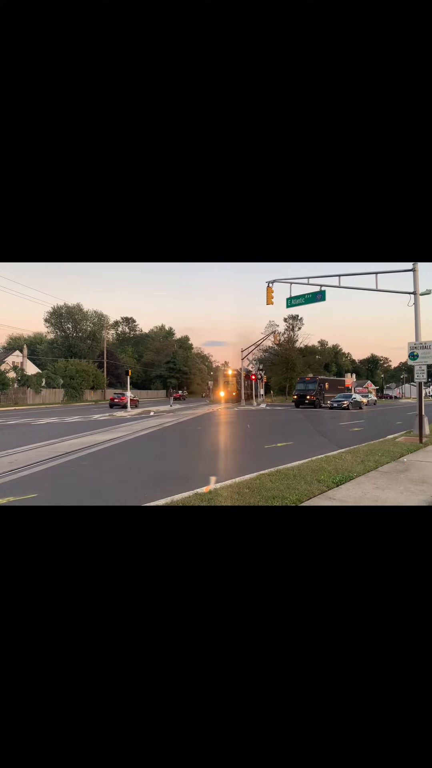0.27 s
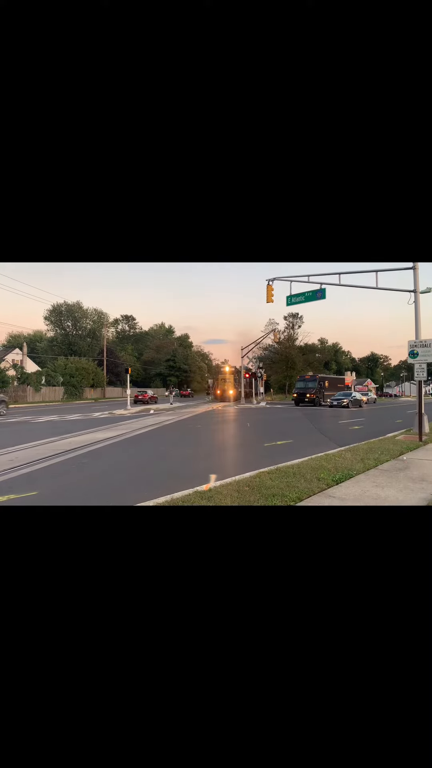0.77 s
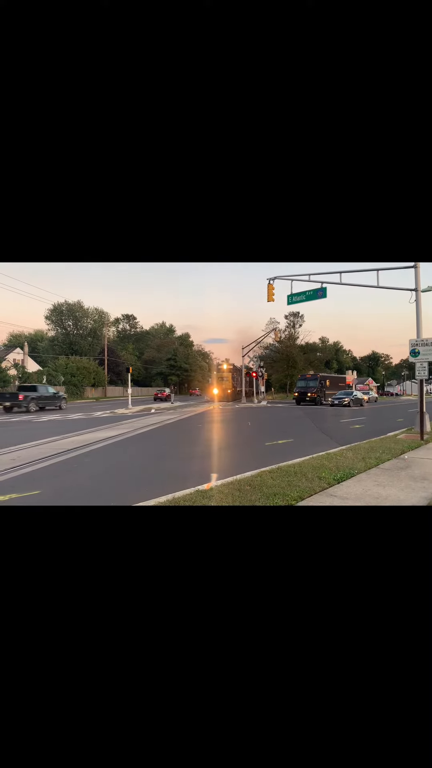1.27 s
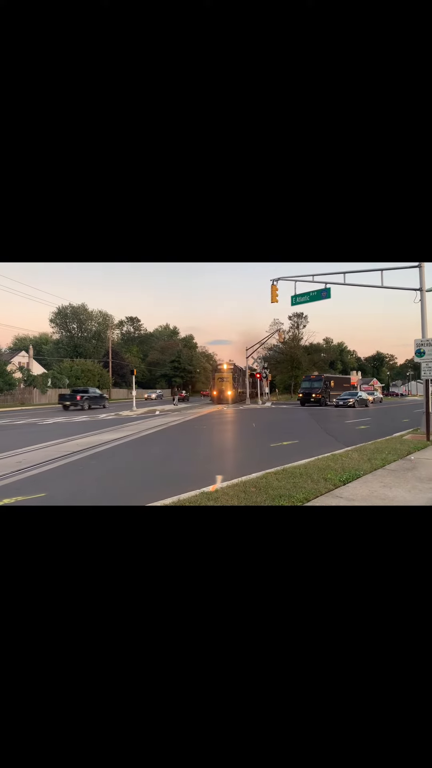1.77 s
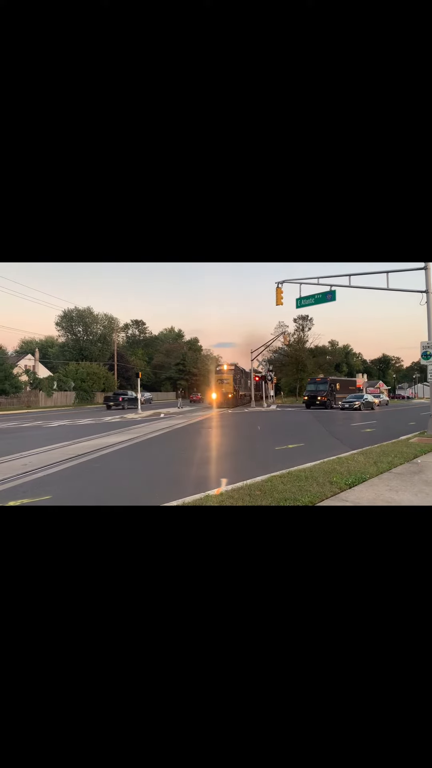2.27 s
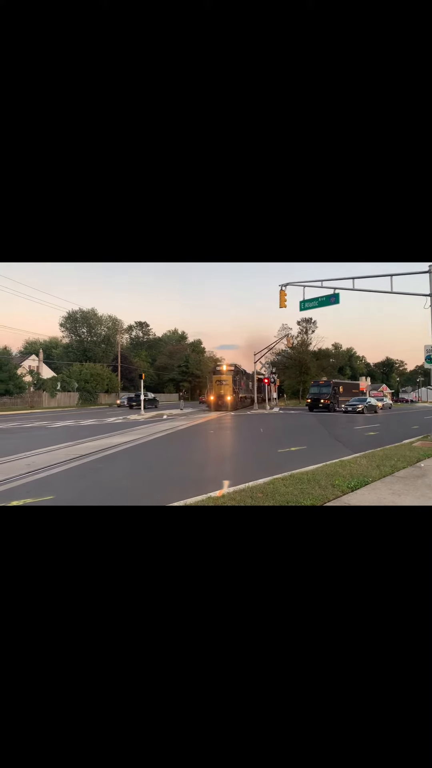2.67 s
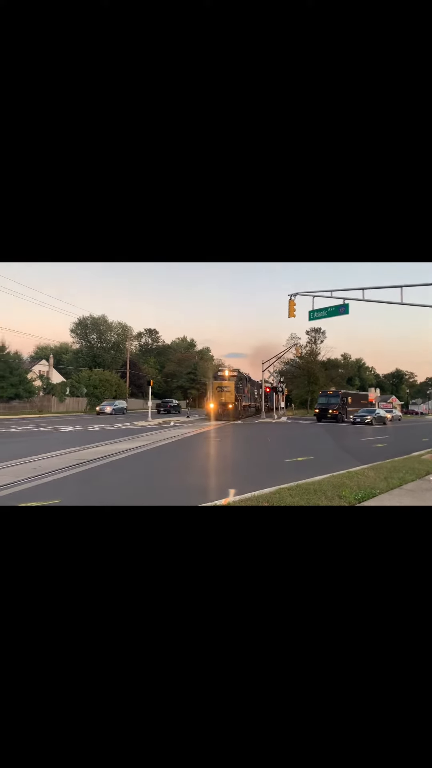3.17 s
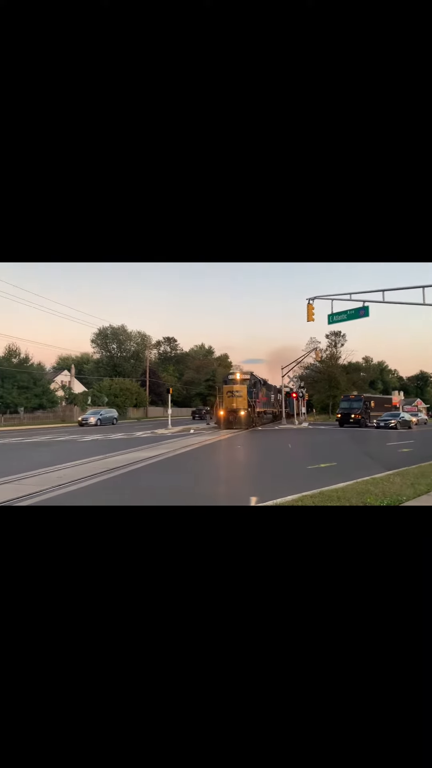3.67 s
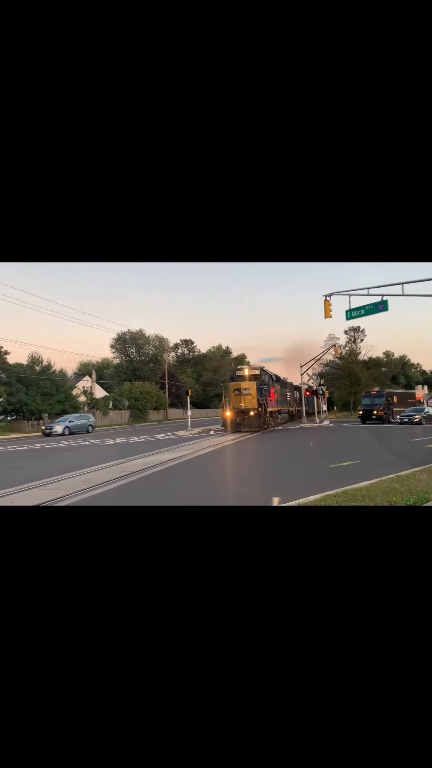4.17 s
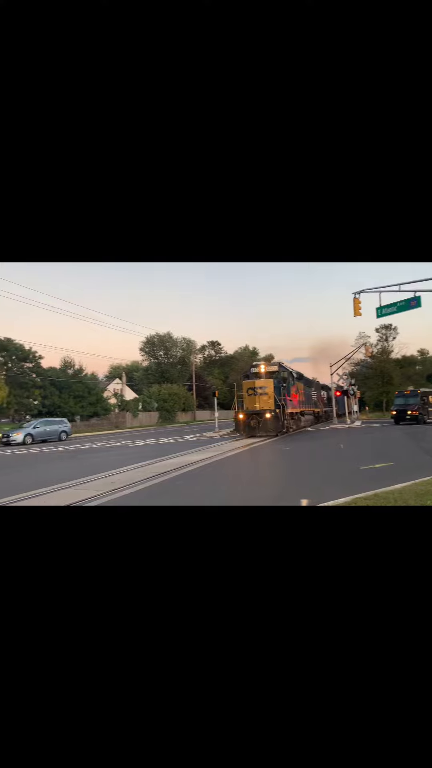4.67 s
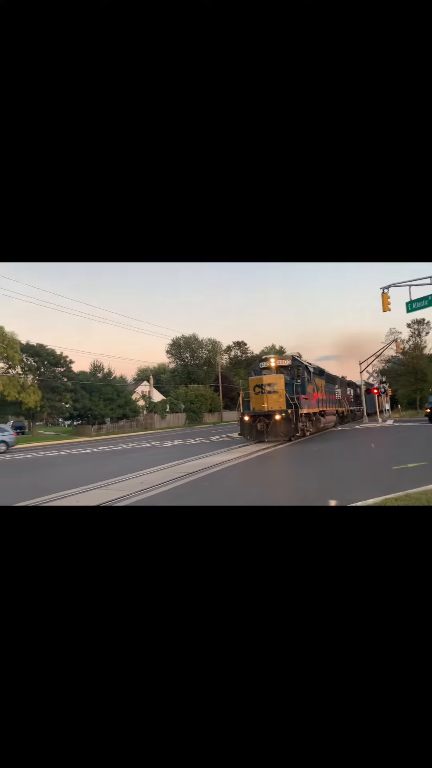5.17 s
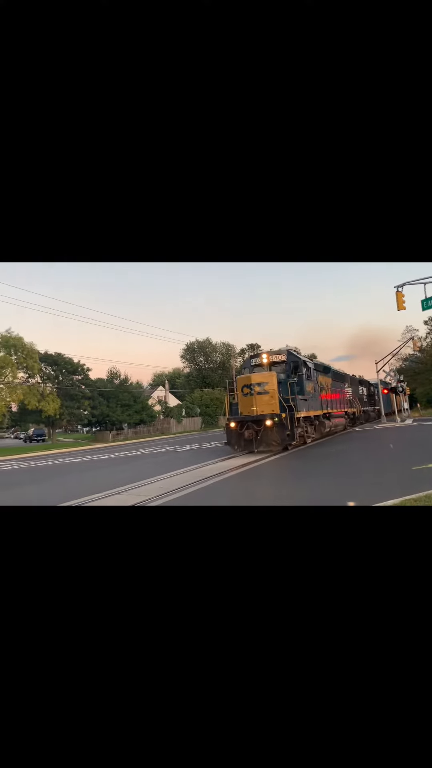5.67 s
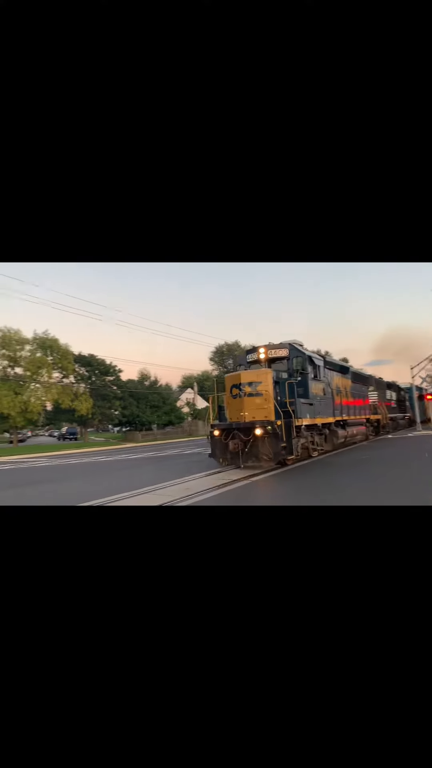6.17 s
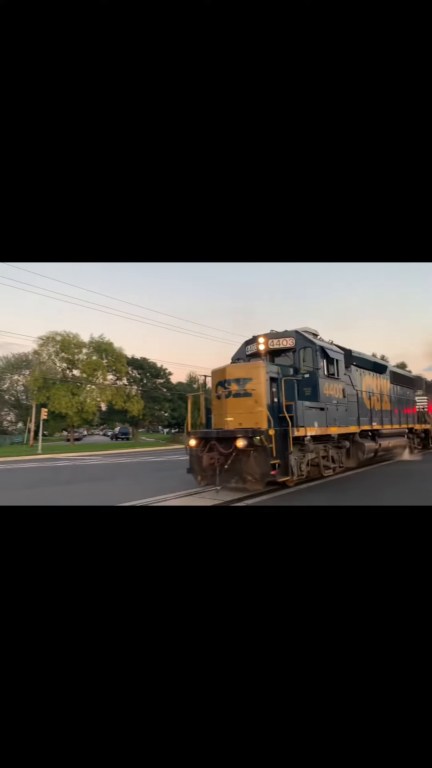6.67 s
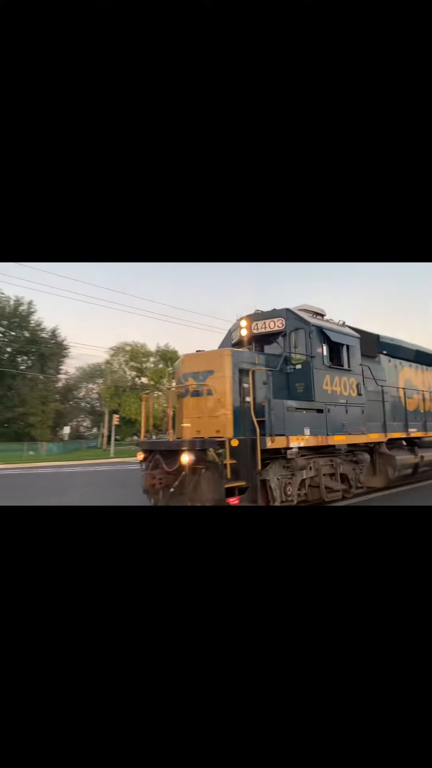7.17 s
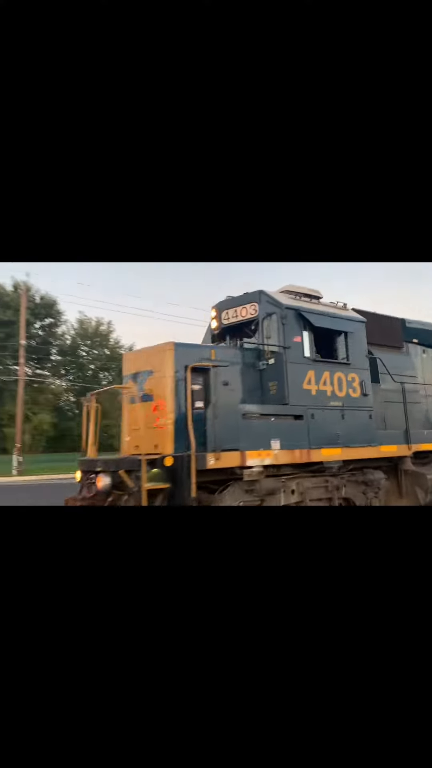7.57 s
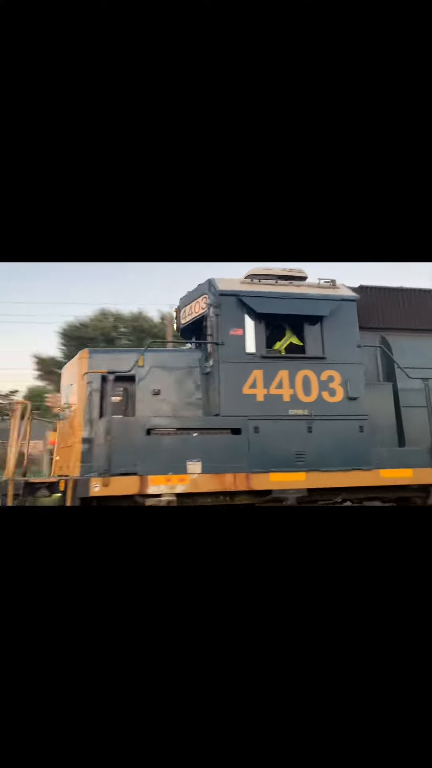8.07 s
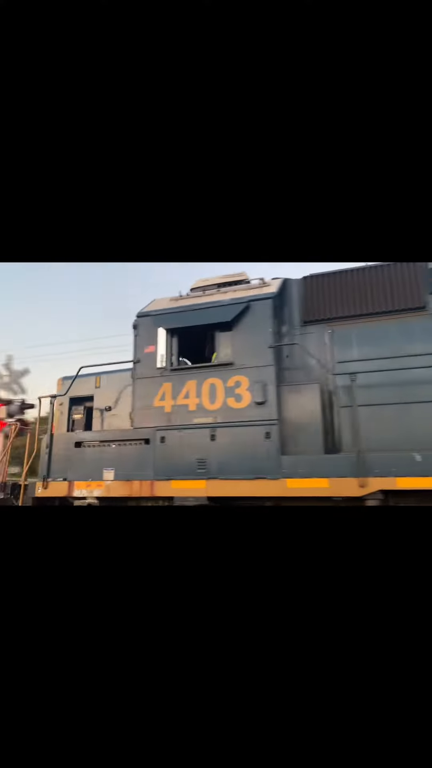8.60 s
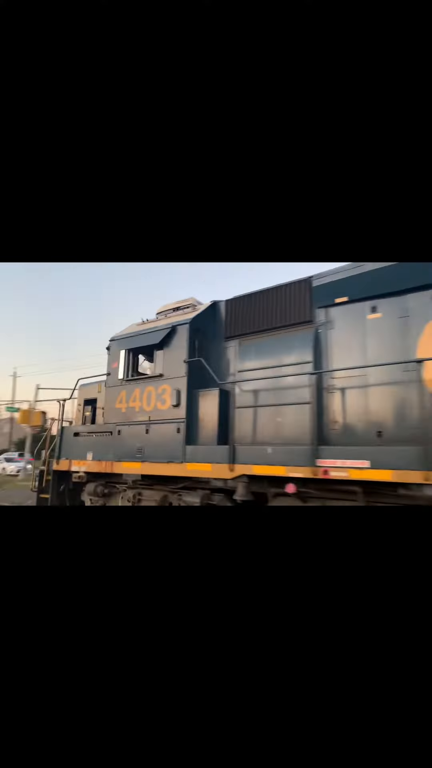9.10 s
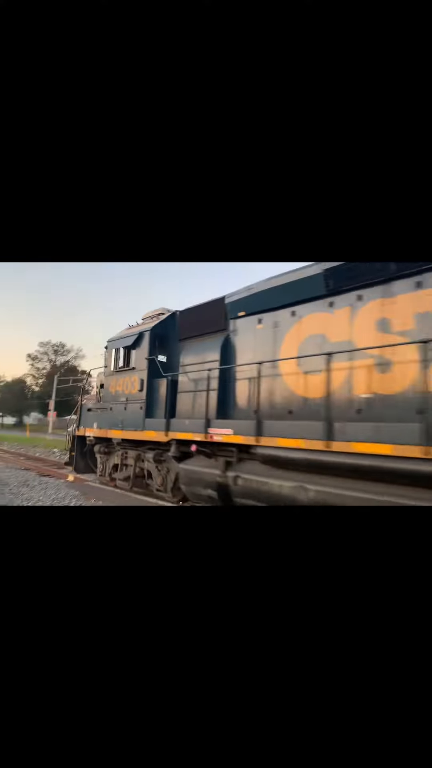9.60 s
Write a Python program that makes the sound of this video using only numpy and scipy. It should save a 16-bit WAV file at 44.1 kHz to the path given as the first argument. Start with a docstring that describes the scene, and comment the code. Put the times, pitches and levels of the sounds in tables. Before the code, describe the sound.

Crossing gongs clang while a freight engine approaches, toots briefly, blares one long echoing horn, tolls its bell and rumbles past close with hissing air.

```python
"""A diesel locomotive throbs, nearing a road crossing and a phone, and crossing gongs ring throughout; over them come
a short blast of its five-pipe air horn, four bell strokes, a brief leak of air, a wheel knock and a long blast.
Walls behind the train throw horn and bell back late and lower in pitch; gain control turns the sound down and holds
it there. Four more strokes follow; up close, air hisses and wheels knock again. Horn, bell, gongs and engine are sums
of tones; air, road, fans and rumble are shaped noise."""
import sys
import numpy as np
from scipy import signal
from scipy.fft import rfft, irfft
from scipy.io import wavfile
from scipy.ndimage import uniform_filter1d, minimum_filter1d

SR = 44100
rng = np.random.default_rng(int(sys.argv[2]) if len(sys.argv) > 2 else 0)


def inscribe(sig):
    """Save sig as 16-bit PCM at rate SR to the path in sys.argv[1].

    A 1-D sig is mono; a 2-D sig holds one channel per row.
    Samples are clipped to [-1, 1] before scaling.
    """
    pcm = np.round(np.clip(np.atleast_2d(sig).T, -1, 1) * 32767)
    wavfile.write(sys.argv[1], SR, pcm.astype(np.int16))


def volts_from_decibels(level):
    """Turn decibel levels (scalar or array-like) into linear amplitude factors."""
    exponent = np.asarray(level, float) / 20
    return 10 ** exponent


N = 433944
T = np.arange(N) / SR
FRAME_T = np.arange(-4, N // 256 + 5) * 256 / SR
BIN_HZ = np.fft.rfftfreq(1024, 1 / SR)


def evened(x):
    """Scales to rms 1."""
    return x / np.sqrt(np.mean(abs(x) ** 2) + 1e-20)


def read(points, hz):
    """Reads a spectrum on a log-frequency axis."""
    f, value = np.transpose(points)
    return np.interp(np.log(hz + 1), np.log(f + 1), value)


def curves(rows, t):
    """Joins the rows of a table by straight lines, one curve per column after the time."""
    s, *columns = np.transpose(rows)
    return [np.interp(t, s, c) for c in columns]


def add(mix, s, sound):
    """Mixes a sound in at time s, cropped to the mix."""
    start = round(s * SR)
    part = mix[..., max(start, 0):start + sound.shape[-1]]
    part += sound[..., max(-start, 0):][..., :part.shape[-1]]


def drift(t, rate_hz, count):
    """Slow random curves of rms about 1, one row for each of count things."""
    steps = int((t[-1] - t[0]) * rate_hz * 2) + 40
    rows = uniform_filter1d(rng.standard_normal((count, steps * 4)), 4) * 2
    return np.array([np.interp((t - t[0]) * rate_hz * 8, np.arange(steps * 4), r) for r in rows])


def shape(points, lo_hz=0, hi_hz=30000):
    """Gains per bin, of power 1 between lo_hz and hi_hz."""
    gain = volts_from_decibels(read(points, BIN_HZ))
    inside = (BIN_HZ >= lo_hz) & (BIN_HZ <= hi_hz)
    return (gain / np.linalg.norm(gain[inside]))[:, None]


def coloured(points, count):
    """A stretch of noise with the given spectrum, rms 1."""
    gain = volts_from_decibels(read(points, np.fft.rfftfreq(count, 1 / SR)))
    return evened(irfft(rfft(rng.standard_normal(count)) * gain, count))


def noise(gain, patchy_db):
    """Two unrelated noises with the given short-time spectrum and shared drifting patches."""
    a, b, c, d, patches = rng.standard_normal((len(FRAME_T), 513, 5)).T
    patches = evened(uniform_filter1d(uniform_filter1d(patches, 10, 0), 12, 1))
    z = np.array([a + 1j * b, c + 1j * d]) * gain * volts_from_decibels(patchy_db * patches)
    out = signal.istft(z, nperseg=1024, noverlap=768)[1][:, 1024:N + 1024]
    return out * np.sqrt(3 / 2)  # makes up for averaging unrelated frames


def ring(hz, db, t60, t):
    """One mode, decaying exponentially from a random phase."""
    return volts_from_decibels(db - 60 * t / t60) * np.sin(2 * np.pi * (hz * t + rng.random()))


# Horn pipes. Each row: nominal pitch in Hz, level in dB, slope in dB per octave of overtone.
PIPES = [(318.1, -4, 0), (374.4, 0.3, 0), (431, -4.5, 1.5), (498.4, -1, 0), (632.8, 2, 0.1)]
# Time each pipe speaks on after the valve shuts, in s, in pipe order.
PIPE_LINGER_S = [0.025, 0.0044, 0.029, .004, 0.037]
# Response of the flares. Each row: frequency in Hz, gain in dB.
FLARE_RESPONSE = [(250, -16), (330, -12.5), (500, -10.5), (640, 1.5), (760, 1), (870, -6), (1130, -14.5),
                  (1280, -11), (1900, -15.5), (2600, -27.5), (3500, -40.5), (3750, -32), (4500, -29)]
# Rasp spectrum. Each row: frequency in Hz, density in dB per Hz.
RASP_SPECTRUM = [(500, -23), (1500, -1), (2500, -16.5), (4000, -9.5), (7000, -19.5), (10800, -24.5),
                 (11300, -62), (16000, -78)]
HORN_RISE_S, SWELL_DB, SWELL_S, RELEASE_DB_PER_S = 0.036, 10.5, 0.14, 455  # speaks fast, swells to full pressure
SHARP, SHARP_S = 0.02946, 0.0604  # starts sharp by this share and settles
BRIGHT_START, BRIGHT_FULL = -0.35, 0.24  # dB per octave above 900 Hz
LOW_SWELL_DB = 3.5  # gain of the tones below 550 Hz at full pressure


def horn(length_s, full_db, ratio, low_db):
    """Five reeds buzz into flared pipes, sharp at first; overtones shimmer in moving air over a pulsing rasp."""
    t = T[:round(length_s * 10 + 2) * SR // 10]
    lack = np.exp(-t / SWELL_S)  # missing pressure
    pitch = ratio * (1 + SHARP * np.exp(-t / SHARP_S))
    low_db = low_db + LOW_SWELL_DB * (1 - lack)
    bright = BRIGHT_FULL + (BRIGHT_START - BRIGHT_FULL) * lack
    steady = out = puffs = 0
    for (pipe_hz, pipe_db, slope_db), linger_s in zip(PIPES, PIPE_LINGER_S):
        reed = 1 + 0.0004 * drift(t, 34, count=1)[0]
        turns = np.cumsum(pipe_hz * pitch * reed) / SR
        puffs = puffs + np.exp(-(turns % 1) / 0.32)
        pipe = 0
        overtones = np.arange(1, max(3500 // pipe_hz, 7) + 1)
        for k, shimmer in zip(overtones, drift(t, 9, count=len(overtones))):
            hz = k * pipe_hz
            octaves = max(np.log2(hz / 900), 0)
            tilt_db = bright * octaves + slope_db * np.log2(k) + low_db * (hz < 550)
            shimmer_db = (2.1 + 0.4 * octaves) * shimmer
            level = volts_from_decibels(pipe_db + read(FLARE_RESPONSE, hz) + tilt_db + shimmer_db)
            pipe = pipe + level * np.cos(2 * np.pi * k * turns + 0.21 * k * k)
        steady = steady + pipe
        out = out + pipe * volts_from_decibels(-RELEASE_DB_PER_S * np.maximum(t - length_s - linger_s, 0))
    rasp = evened(puffs * coloured(RASP_SPECTRUM, count=len(t)))
    rasp *= volts_from_decibels(2 * bright + 1.9 * drift(t, 18, count=1)[0])
    rasp *= volts_from_decibels(-18.0 - RELEASE_DB_PER_S * np.maximum(t - length_s, 0))
    out = out / np.sqrt(uniform_filter1d(steady ** 2, size=6000)) + rasp
    return volts_from_decibels(full_db - SWELL_DB * lack) * np.minimum(t / HORN_RISE_S, 1) ** 2 * out


# Each row: start in s, valve open in s, relative full level in dB, pitch ratio, onset gain below 550 Hz in dB.
HORN_BLASTS = [(.055, 0.072, -7, 1.006, 12), (3.438, 1.14, -1, .9993, 1.7)]


def blasts():
    """Places each opening of the horn valve in time."""
    out = np.zeros(N)
    for s, *blast in HORN_BLASTS:
        add(out, s, volts_from_decibels(-1.0) * horn(*blast))
    return out


OFF_AXIS_HZ, OFF_AXIS_S, OFF_AXIS_DB_PER_S = (1050, 2700), 3.65, 10  # the flares swing past the listener


def aimed(x):
    """Straight sound of the horn: its brassy overtones fade once the flares point elsewhere."""
    brass = signal.filtfilt(*signal.butter(2, OFF_AXIS_HZ, "bandpass", fs=SR), x)
    return x - brass * (1 - volts_from_decibels(-OFF_AXIS_DB_PER_S * np.maximum(T - OFF_AXIS_S, 0)))


# Approach of the train. Each row: time in s, nearness from 0 far to 1 alongside.
NEARNESS_CURVE = [(0, 0.0081), (5.5, 0.19), (7, 0.38), (8.2, 0.842), (9.84, 0.8)]
# Each row: start in s, relative level in dB, then weights in dB of hum, strike mode, 4 kHz pair, treble modes.
BELL_STROKES = [(0.4329, -32.5, 6.5, 7, 3.5, -4), (1.2459, -35.5, 6.5, 0, 5, 6.5),
                (2.05, -27.5, 7, 0, 1, 1), (2.858, -27.5, 7.5, -3, 5.5, 1), (5.294, -15, -6.5, -4, 0, -3.5),
                (6.121, -18.5, 2, -1, -2, -1.5), (6.9354, -8.5, -4, 0.5, -3.5, -1),
                (7.7462, -10.5, 3.5, 0, 6, 6)]
# Modes, hum first. Each row: frequency from afar in Hz, level in dB, t60 from afar in s, gap to the twin in Hz.
BELL_MODES = [(1152, -7, 2.1, 1.7), (2205, -4, 0.3, 4.3), (2509, 2, 0.68, 5.5), (3871, -9, .55, 3.9),
              (4161, -3, 1.15, 3), (6056, -5, 0.33, 6.1), (6158, -10, 0.85, 8.8), (6555, -14, 0.5, 2.5),
              (7938, -13, 0.4, 21), (8387, -10, 0.7, 5.9), (8786, -19, .4, 9), (10780, -13.5, 0.55, 13)]
CLAP_S, TWIN_DB = 0.009, -14
HUM_BLOOM_S, HUM_TWIN_DB, HUM_CREST_S = 0.03, -7, .15  # the hum swells after the stroke, holds, then dips
PAIR_BLOOM_S, PAIR_BLOOM_NEAR = .07, .18  # from afar the 4 kHz pair swells in late; not from this nearness on
BELL_FLUTTER_DB, BELL_FLUTTER_HZ = 2.2, 7  # modes swell and dip as paths shift under the moving train
BELL_SAG = .008  # share of pitch lost at nearness 1
NEAR_DAMPING = 0.41  # share of t60 that modes above the hum lose at nearness 1


def bell():
    """Each mode of the casting is a close pair that beats and flutters; strokes weigh the modes differently."""
    t, out, above = T[:SR * 6 // 5], np.zeros(N), len(BELL_MODES) - 1
    coarse_t = t[::128]
    twins_db = [HUM_TWIN_DB] + [TWIN_DB] * above
    crests_s = [HUM_CREST_S] + [0] * above
    luck = rng.standard_normal((len(BELL_STROKES), len(BELL_MODES)))
    for (s, db, hum_db, strike_db, pair_db, treble_db), chance in zip(BELL_STROKES, luck):
        near = curves(NEARNESS_CURVE, s)[0]
        flutter = volts_from_decibels(BELL_FLUTTER_DB * drift(coarse_t, BELL_FLUTTER_HZ, count=len(BELL_MODES)))
        flutter[0] = np.sqrt(flutter[0])  # the hum is the steadiest
        keeps = [1] + [1 - NEAR_DAMPING * near] * above
        modes = []
        for (hz, mode_db, t60, gap_hz), twin_db, crest_s, keep, f in zip(
                BELL_MODES, twins_db, crests_s, keeps, flutter):
            beat = 1 + volts_from_decibels(twin_db) * np.cos(2 * np.pi * gap_hz * (coarse_t - crest_s))
            mode = ring(hz * (1 - BELL_SAG * near ** 2), mode_db, t60 * keep, t)
            modes.append(mode * np.interp(t, coarse_t, f * beat))
        modes = np.array(modes)
        modes[0] *= 1 - np.exp(-t / HUM_BLOOM_S)
        bloom_s = CLAP_S + PAIR_BLOOM_S * max(1 - (near / PAIR_BLOOM_NEAR) ** 4, 0)
        modes[3:5] *= 1 - np.exp(-t / bloom_s)
        weight_db = np.array([hum_db, strike_db, 0, pair_db, pair_db] + [treble_db] * (above - 4), float)
        weight_db[5:] += 2 * chance[5:]
        add(out, s, volts_from_decibels(db + weight_db) @ modes * np.minimum(t / CLAP_S, 1))
    return out


# Each row: time in s, relative firing tone level in dB, relative rumble level in dB, wash over rumble in dB.
ENGINE_LEVELS = [(0, -22.5, -28.5, 2), (.12, -17, -24.5, -4.5), (2.6, -16, -23.5, -3),
                 (3.4, -16, -18.5, -5.5), (5.1, -10, -21, -0.5), (5.6, -14, -17.5, -8),
                 (7.1, -14, -17, -3.5), (7.6, -10.5, -15.5, -4.5), (8.4, -10, -14.5, -3.5),
                 (9.84, -12.5, -14, -4)]
# Lower once the exhaust draws level. Each row: time in s, firing rate in Hz.
FIRING_RATE = [(0, 65.5), (7.9, 65.65), (8.6, 64.8), (9.84, 64.4)]
# Exhaust tones, eight firings a turn. Each row: multiple of the shaft speed, far dB, alongside dB.
SHAFT_ORDERS = [(7, -12, -11), (8, 1.5, 0), (9, -8, -11), (10, -14, -16), (11, -9.5, -22.5), (12, -21, -23),
                (13, -9, -19), (15, -22, -27.5), (16, -23, -14), (17, -22, -14), (18, -23.5, -12.5),
                (24, -23.5, -23.5)]


def engine():
    """Shaft orders as wavering tones; the balance of orders shifts as the exhaust comes alongside."""
    t = T[::64]
    firing_hz, = curves(FIRING_RATE, t)
    tone_db = curves(ENGINE_LEVELS, t)[0]
    near, = curves(NEARNESS_CURVE, t)
    turns = np.cumsum(np.interp(T, t, firing_hz / 8)) / SR
    sways = drift(t, 1.6, count=len(SHAFT_ORDERS))
    wanders = drift(t, 1.2, count=len(SHAFT_ORDERS))
    out = 0
    for (k, far_db, near_db), sway, wander in zip(SHAFT_ORDERS, sways, wanders):
        loose = .25 if k == 8 else 1  # the firing tone is the steadiest
        order_db = (1 - near) * far_db + near * near_db
        level = np.interp(T, t, volts_from_decibels(tone_db + order_db + 2.2 * loose * sway))
        phase = 2 * np.pi * k * turns + np.interp(T, t, .55 * loose * wander) + .35 * k * k
        out = out + level * np.sqrt(2) * np.cos(phase)
    return out


# Leaks. Each row: start in s, length in s, relative settled level in dB, rise in s.
AIR_LEAKS = [(1.807, 0.3, -54.5, 0.022), (6.536, 3.4, -21, 0.14)]
# Bright hiss. Each row: frequency in Hz, density in dB per Hz.
AIR_BRIGHT_SPECTRUM = [(700, -22), (1200, -10), (2500, -4), (4200, -0.5), (6000, 0), (9800, -0.5),
                       (11500, 3), (13500, -4.5), (15600, 1.5), (16000, -55)]
# Dull hiss. Each row: frequency in Hz, density in dB per Hz.
AIR_DULL_SPECTRUM = [(400, -39), (750, -10.5), (2000, -2.5), (4100, 2.5), (6000, -0.5), (8900, -11.5),
                     (11200, -7.5), (15600, -15), (16000, -45.5)]
# Each row: time in s, share of the dull colour from 0 to 1.
DULL_SHARE = [(2, 0.7), (6.68, 1), (6.9, 0.65), (7.5, 0.82), (8.2, 0.22), (8.7, 0.7), (9.4, 0.37),
              (9.84, 0.68)]
AIR_BURST_DB, AIR_SETTLE_S, AIR_SHUT_S = 6, .14, .06  # each leak starts with a burst and settles


def air_power():
    """Spectral power of escaping air: a valve opens, bursts, settles and shuts; its colour shifts."""
    dull = np.clip(curves(DULL_SHARE, FRAME_T)[0], 0, 1)
    colour = (1 - dull) * shape(AIR_BRIGHT_SPECTRUM, 6280, 8290) ** 2
    colour = colour + dull * shape(AIR_DULL_SPECTRUM, 3130, 12000) ** 2
    power = 0
    for s, length_s, db, rise_s in AIR_LEAKS:
        t = FRAME_T - s
        valve = np.clip(t / rise_s, 0, 1) ** 2 * np.clip(1 - (t - length_s) / AIR_SHUT_S, 0, 1)
        burst_db = AIR_BURST_DB * np.exp(-np.maximum(t - rise_s, 0) / AIR_SETTLE_S)
        power = power + (valve * volts_from_decibels(db + burst_db)) ** 2 * colour
    return power


# Engine rumble. Each row: frequency in Hz, density in dB per Hz.
RUMBLE_SPECTRUM = [(15, -75), (40, -56), (58, -13), (80, -2.5), (110, -7.5), (160, -15), (270, -12),
                   (400, -67.5)]
# Wash of road and fans from afar. Each row: frequency in Hz, density in dB per Hz.
WASH_FAR_SPECTRUM = [(180, -14.5), (270, -9), (460, -15.5), (650, -12.5), (850, -15.5), (1500, -19.5),
                     (2300, -25.5), (3000, -31), (4500, -30.5), (7000, -37.5), (10500, -48.5), (11500, -66),
                     (16000, -99)]
# Wash alongside. Each row: frequency in Hz, density in dB per Hz.
WASH_NEAR_SPECTRUM = [(180, -25), (280, -5), (470, -15), (760, -16), (2500, -38), (5000, -41)]


def rumble_and_wash_power():
    """Spectral power of rumble and wash on one level; the wash changes colour with nearness."""
    _, rumble_db, wash_db = curves(ENGINE_LEVELS, FRAME_T)
    near = np.clip(curves(NEARNESS_CURVE, FRAME_T)[0], 0, 1)
    rumble = (volts_from_decibels(-5.5) * shape(RUMBLE_SPECTRUM, 120, 290)) ** 2
    wash = (1 - near) * shape(WASH_FAR_SPECTRUM) ** 2 + near * shape(WASH_NEAR_SPECTRUM) ** 2
    return (rumble + volts_from_decibels(wash_db - 4.5) ** 2 * wash) * volts_from_decibels(rumble_db) ** 2


# Each row: centre in Hz, width in Hz, far level over rumble in dB, alongside level over rumble in dB.
FAN_WHINES = [(651.5, 16.3, -17.5, -13), (6750, 240, -26.5, -45)]


def whines():
    """Fuzzy whines of fans and blower: narrow noise shifted up to each centre."""
    rumble_db = curves(ENGINE_LEVELS, FRAME_T)[1]
    near = np.clip(curves(NEARNESS_CURVE, FRAME_T)[0], 0, 1)
    out = np.zeros(N)
    for hz, width_hz, far_db, near_db in FAN_WHINES:
        smooth = signal.butter(2, width_hz / 2, fs=SR, output="sos")
        fuzz = evened(signal.sosfilt(smooth, rng.standard_normal(N) + 1j * rng.standard_normal(N)))
        level = np.interp(T, FRAME_T, volts_from_decibels(rumble_db + (1 - near) * far_db + near * near_db))
        out += level * np.sqrt(2) * (fuzz * np.exp(2j * np.pi * hz * T)).real
    return out


def roar():
    """Rumble, wash and air as patchy noise in two unrelated rows; the whines join the first."""
    out = noise(np.sqrt(rumble_and_wash_power() + air_power()), patchy_db=1.75)
    out[0] += whines()
    return out


# Modes, one list per gong. Each row: frequency in Hz, level in dB, t60 in s.
GONG_MODES = [
    [(1497, 0, 1.5), (2024, -10, 1.2), (2589, -4, 1.3), (1007, -8, 1.5)],
    [(1550, 0, 1.5), (2440, -5, 1.1)],
    [(1499, 0, 1.5), (1552, -9, .6)],
]
# One row per gong: first stroke in s, time between strokes in s.
GONG_STROKES = [(-.137, .347), (-.14, .33), (-.06, .346)]
# Relative level of each gong in dB.
GONG_LEVELS_DB = [-33, -43.5, -31]
# The third gong swells before the long blast. Each row: time in s, added level in dB.
THIRD_GONG_SWELL = [(0, -16), (2.4, -5), (3.199, 5), (4.4, 2), (5.4, -3.5)]
SCREEN_DB = -9  # at nearness 1: the train hides the gongs


def gongs():
    """Each gong is struck evenly and damped just before the next stroke."""
    out = np.zeros(N)
    swells_db = [0, 0, *curves(THIRD_GONG_SWELL, T)]
    for (first_s, gap_s), modes, db, swell_db in zip(GONG_STROKES, GONG_MODES, GONG_LEVELS_DB, swells_db):
        t, one = T[:round(gap_s * SR)], np.zeros(N)
        for s in first_s + gap_s * np.arange(32):
            stroke = sum(ring(*mode, t) for mode in modes) * volts_from_decibels(1.2 * rng.standard_normal())
            add(one, s, stroke * np.minimum(t / 0.0034, 1) * np.clip((gap_s - t) / 0.13, 0, 1))
        out += volts_from_decibels(db + swell_db) * one
    return volts_from_decibels(SCREEN_DB * curves(NEARNESS_CURVE, T)[0]) * out


# Each row: start in s, relative level in dB, ring in Hz, time for the rattle to fall 20 dB in s.
WHEEL_KNOCKS = [(2.636, -9, 503, 0.28), (8.209, -11.5, 1990, 0.13)]
# Rattle. Each row: frequency in Hz, density in dB per Hz.
KNOCK_SPECTRUM = [(90, -22), (200, -1.5), (640, -17), (1200, -16), (3400, -33), (9000, -40.5),
                  (11500, -63.5)]


def knocks():
    """Wheels knock over gaps in the rails: a dull decaying rattle and a short ring."""
    out, t = np.zeros(N), T[:SR // 2]
    for s, db, hz, spread_s in WHEEL_KNOCKS:
        rattle = volts_from_decibels(db - 9.5 - 20 * t / spread_s) * coloured(KNOCK_SPECTRUM, count=len(t))
        add(out, s, (rattle + ring(hz, db - 4.0, 0.11, t)) * np.minimum(t / 0.0092, 1))
    return out


# Each row: delay when loudest in s, growth in s per s, loudest at s, level then in dB, fade either side in dB per s.
WALL_ECHOES = [(.045, 0.029, 1, -1.5, 4), (.08, 0.016, 3.5, -3, 5.5), (.085, .03, 4.5, -4, 14),
               (.245, .03, 1, -5, 9), (.36, 0.026, 0, -7.5, 10), (.46, .03, 0.5, -12.5, 4),
               (.075, .02, 0.7, -1, 5.5), (.17, 0.023, 0.86, -5.5, 5)]
WALL_DULL_HZ = 4200
WALL_PATCHY_DB, WALL_PATCHY_HZ = 2.2, 8  # uneven fronts: each echo swells and dips


def walls(x):
    """The path by way of a wall behind the train keeps growing, which lowers the pitch; walls dull the sound."""
    t, back = T[::128], 0
    uneven_db = WALL_PATCHY_DB * drift(t, WALL_PATCHY_HZ, count=len(WALL_ECHOES))
    for (delay_s, growth, s, db, fade_db), patchy_db in zip(WALL_ECHOES, uneven_db):
        level = np.interp(T, t, volts_from_decibels(db - fade_db * abs(t - s) + patchy_db))
        back = back + level * np.interp(T - delay_s - growth * (T - s), T, x, left=0)
    return signal.lfilter(*signal.butter(1, WALL_DULL_HZ, fs=SR), back)


# Each row: frequency in Hz, t60 in s.
STREET_T60 = [(300, 1.84), (700, 0.99), (2000, 1.95), (5000, 1.35), (10000, 0.093)]


def street(x):
    """Two unrelated tails of sparse taps, each band dying at its own speed."""
    taps = np.zeros((2, 2 * SR))
    at = np.arange(900, 2 * SR - 20, 20) + rng.integers(0, 20, (2, (2 * SR - 901) // 20))
    np.put_along_axis(taps, at, rng.choice([-1., 1.], at.shape), 1)
    hz, t, z = signal.stft(taps, SR, nperseg=256)
    decay = volts_from_decibels(-60 * t / read(STREET_T60, hz)[:, None])
    tail = signal.istft(z * decay, SR, nperseg=256)[1]
    return signal.fftconvolve(x[None], tail / np.linalg.norm(tail[0]), axes=1)[:, :N]


BELL_SHADE_DB = -6.5  # the bell hangs low and reaches the walls weaker


def scene():
    """Row 0: all that both microphone ports share; row 1: the scattered sound that differs between them."""
    horns, strokes = blasts(), bell()
    echoes = walls(horns + volts_from_decibels(BELL_SHADE_DB) * strokes)
    heard = aimed(horns) + strokes + echoes + gongs() + knocks()
    out = roar() + volts_from_decibels(-13.5) * street(heard)
    out[0] += heard + engine()
    out[1] += volts_from_decibels(-9) * np.roll(heard, 190)  # a near reflection reaches the ports unequally
    return out


LISTEN_HZ, THRESHOLD_DB, FALL_S = (300, 1500), -17, 0.064
HELD_S = 0.63  # then the gain steps back to a slow part that creeps up
SLOW_SHARE, MEMORY_S, CREEP_DB_PER_S = 0.7, 0.22, 0.8957


def gain_control(x):
    """Gain that turns down what exceeds a threshold in a middle band, holds, then creeps back."""
    band = signal.sosfilt(signal.butter(2, LISTEN_HZ, "bandpass", fs=SR, output="sos"), x)
    power_db = 10 * np.log10(abs(uniform_filter1d(band ** 2, size=2048)[::64]) + 1e-12)
    excess_db = np.maximum(power_db - THRESHOLD_DB, 0)
    t, keeps = T[::64], np.exp(-64 / SR / np.array([FALL_S, MEMORY_S]))
    over_db, mean_db = (signal.lfilter([1 - k], [1, -k], excess_db) for k in keeps)
    half = round(HELD_S * SR / 128)
    held_db = -minimum_filter1d(-over_db, 2 * half + 1, origin=half, mode="nearest")  # largest of the past
    creep_db = CREEP_DB_PER_S * t
    slow_db = np.maximum.accumulate(SLOW_SHARE * mean_db + creep_db) - creep_db
    return volts_from_decibels(-np.interp(T, t, np.maximum(held_db, slow_db)))


# Each row: frequency in Hz, left-right likeness from 0 to 1.
PORT_LIKENESS = [(60, .9996), (250, 1), (500, 0.96), (900, 0.86), (1500, 0.86), (2500, 0.67), (3400, 1),
                 (4200, 0.49), (5000, 0.85), (5500, 1), (6200, 0.8), (8000, .99), (10000, 0.69),
                 (11500, .999), (13300, 0.88), (14300, .6)]
# Each row: frequency in Hz, left's lead in radians with the train ahead, and with it alongside.
PORT_LEAD = [(60, .08, .08), (332, 0.62, 0.44), (640, 0.12, 1.1), (900, 0.14, 0.6), (1500, 0, 0.9),
             (2080, 1.1, 0), (2650, 1.27, 1.5), (3250, 1.6, 3.05), (3650, 1.9, 3.2), (4200, 2.2, 2),
             (5000, 3.14, 2.5), (5450, 3.9, 3.14), (6200, 4.7, 4.7), (8200, 6.28, 6.28), (10300, 7.9, 7.9),
             (11500, 9.36, 9.36), (13300, 9.48, 9.48), (13750, 10.5, 10.5)]
# Each row: frequency in Hz, left minus right in dB.
PORT_LEAN = [(60, -0.8), (130, -1.3), (290, -1.5), (480, -5.5), (640, -4.5), (1100, -0.5), (2200, -2),
             (6000, 1)]
# Each row: time in s, share of the alongside lead from 0 to 1.
ALONGSIDE_SHARE = [(7.8, 0.07), (8.2, 0.65), (9.35, 1), (9.6, 0)]


def ports(x):
    """Two ports of a phone: likeness, lead and lean change with frequency, lead also with the train's angle."""
    hz, t, (shared, apart) = signal.stft(x, SR, nperseg=1024, noverlap=768)
    same = np.clip(read(PORT_LIKENESS, hz), 0, 1)[:, None]
    f, ahead, beside = np.transpose(PORT_LEAD)
    angle = np.clip(curves(ALONGSIDE_SHARE, t)[0], 0, 1)
    lead = np.outer(np.interp(hz, f, ahead), 1 - angle) + np.outer(np.interp(hz, f, beside), angle)
    turn = np.exp(.5j * lead) * volts_from_decibels(.5 * read(PORT_LEAN, hz))[:, None]  # half to each side
    a, b = np.sqrt((1 + same) / 2), np.sqrt((1 - same) / 2)
    z = np.array([turn * (a * shared + b * apart), (a * shared - b * apart) / turn])
    return signal.istft(z, nperseg=1024, noverlap=768)[1][:, :N]


def top_cut(x):
    """Nothing passes above the cut-off."""
    return signal.sosfilt(signal.butter(12, 16990, fs=SR, output="sos"), x)


def record(dry):
    """Gain control, two ports and soft clipping."""
    x = ports(dry * gain_control(dry[0]))
    mix = 1.724 * np.tanh(x / 1.497)
    return top_cut(mix)


dry = scene()
out = record(dry)
inscribe(out)
```